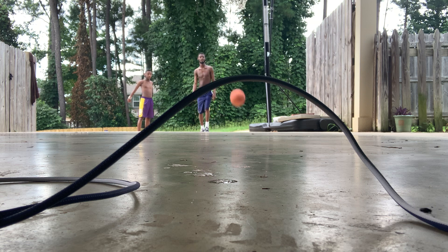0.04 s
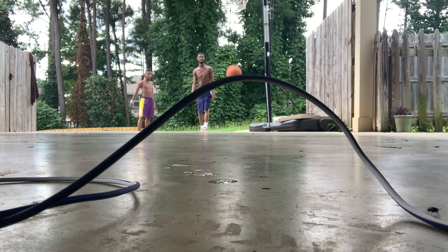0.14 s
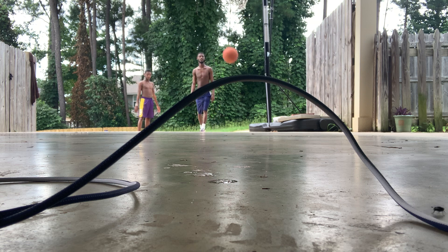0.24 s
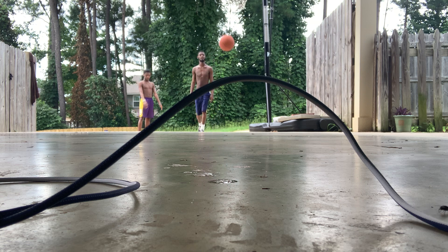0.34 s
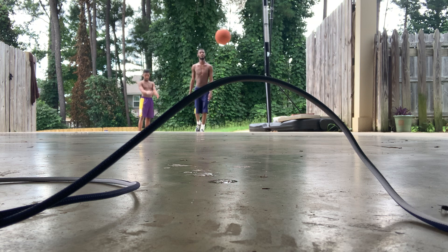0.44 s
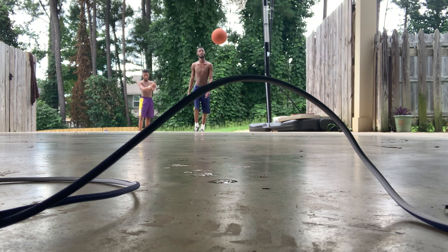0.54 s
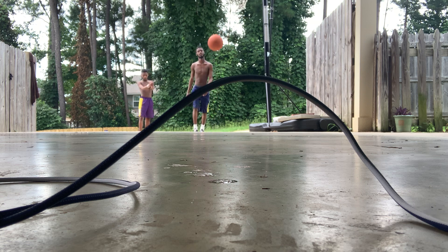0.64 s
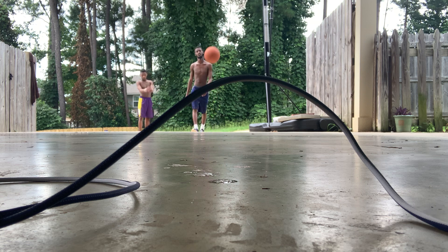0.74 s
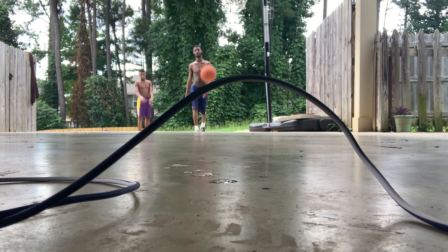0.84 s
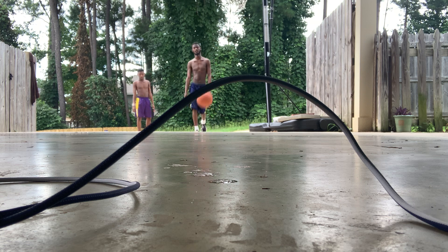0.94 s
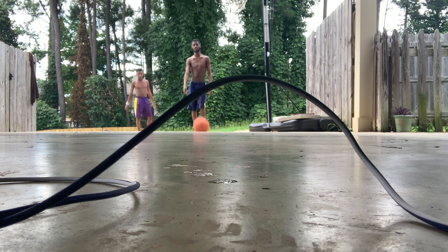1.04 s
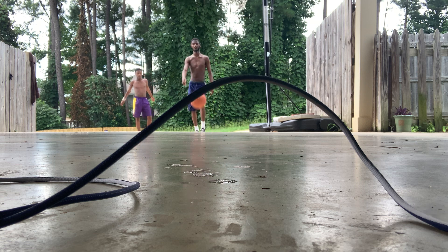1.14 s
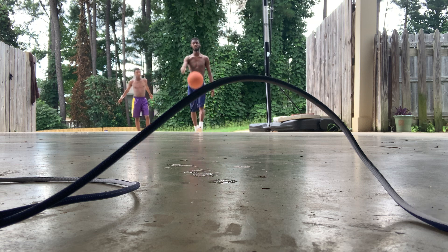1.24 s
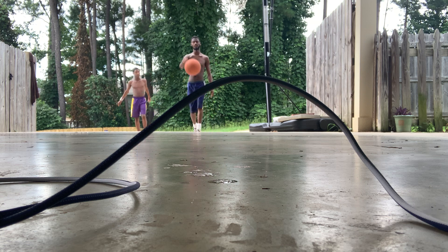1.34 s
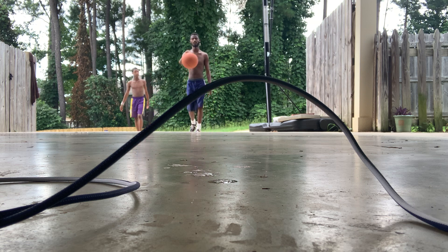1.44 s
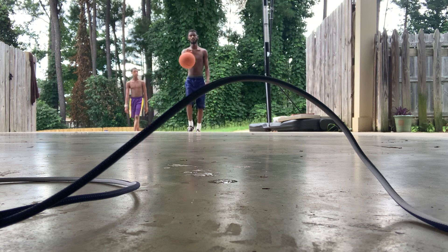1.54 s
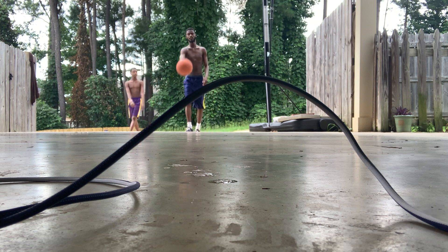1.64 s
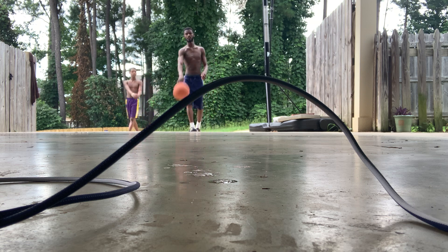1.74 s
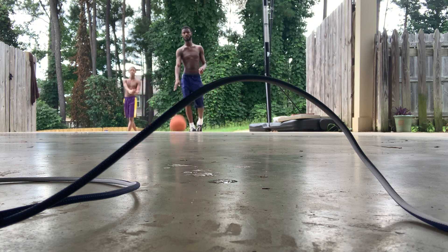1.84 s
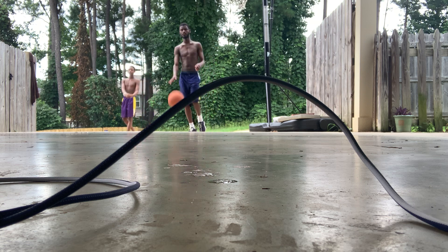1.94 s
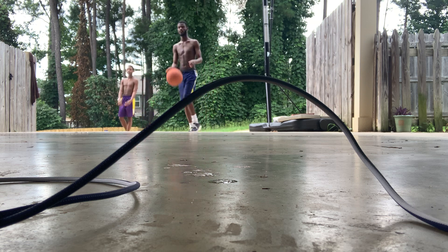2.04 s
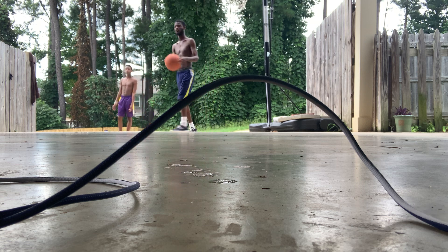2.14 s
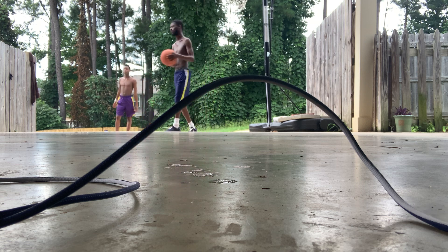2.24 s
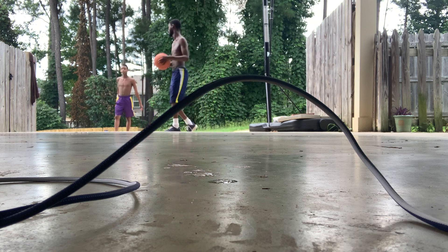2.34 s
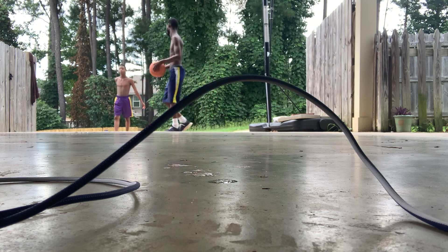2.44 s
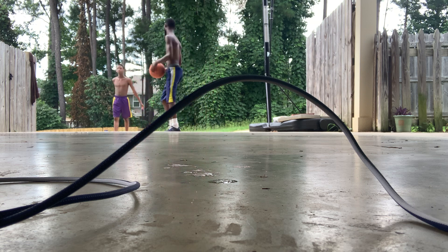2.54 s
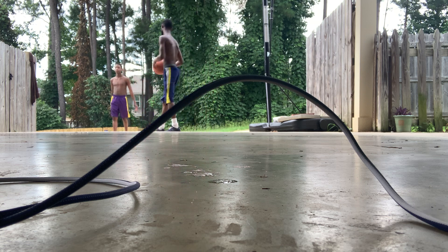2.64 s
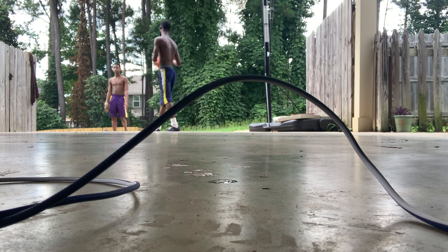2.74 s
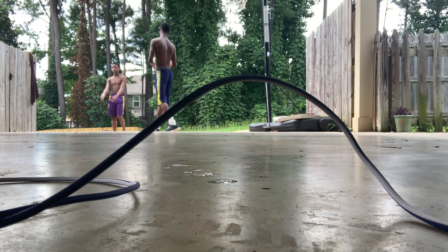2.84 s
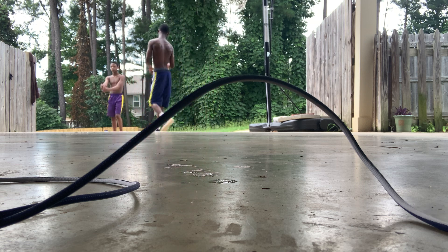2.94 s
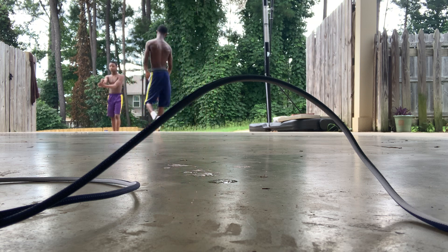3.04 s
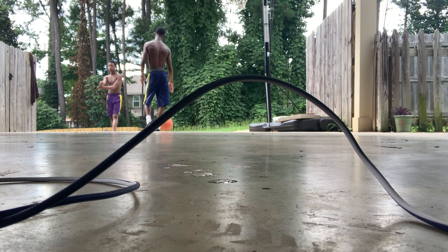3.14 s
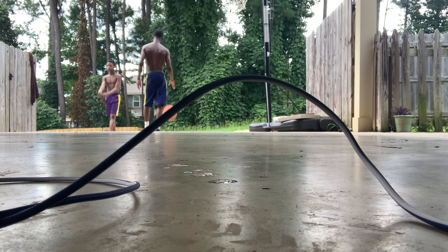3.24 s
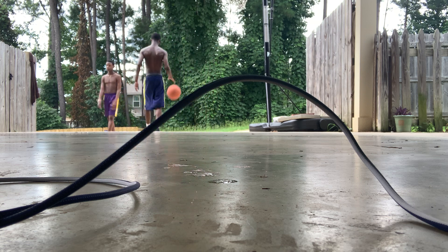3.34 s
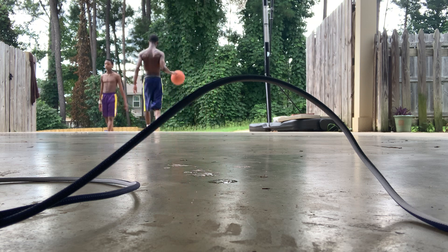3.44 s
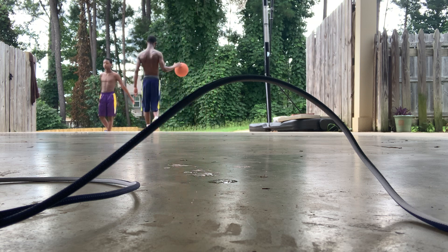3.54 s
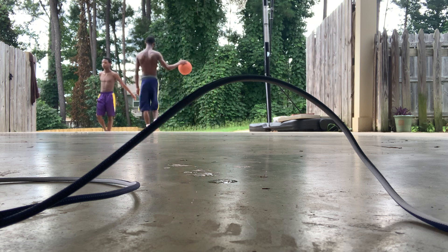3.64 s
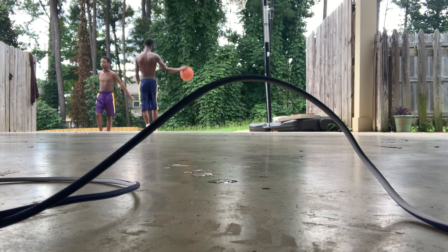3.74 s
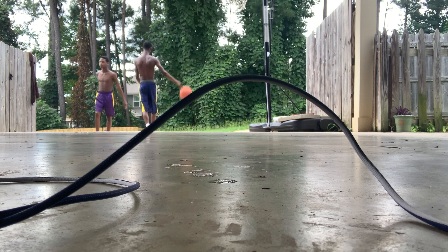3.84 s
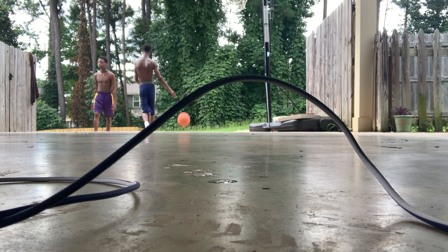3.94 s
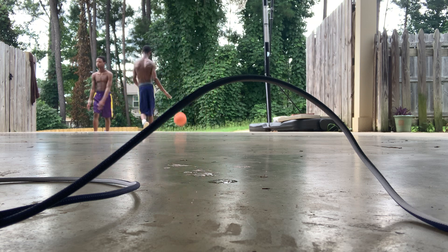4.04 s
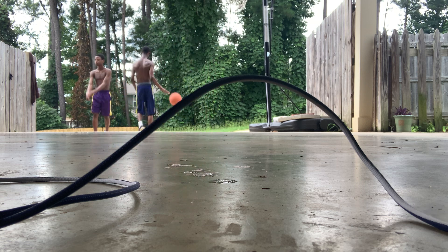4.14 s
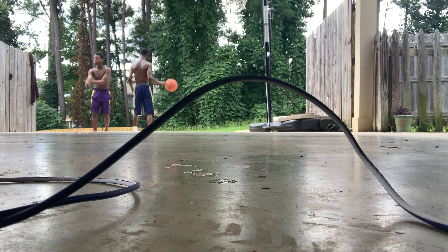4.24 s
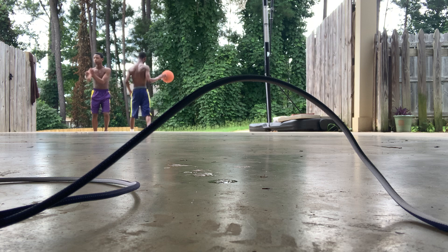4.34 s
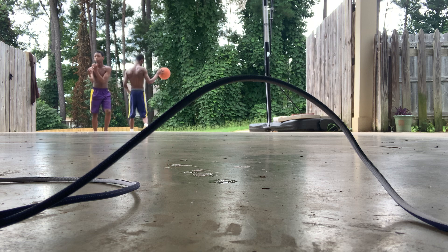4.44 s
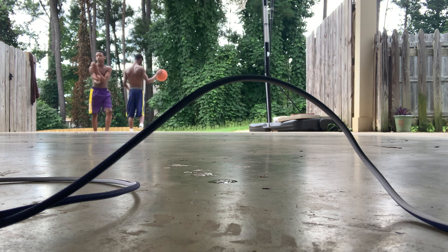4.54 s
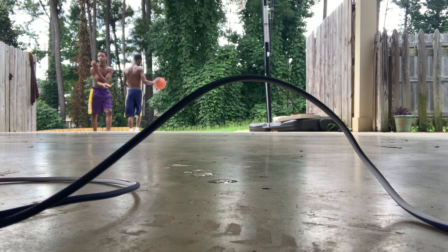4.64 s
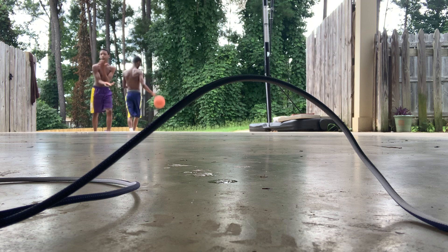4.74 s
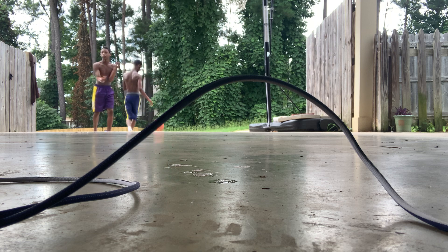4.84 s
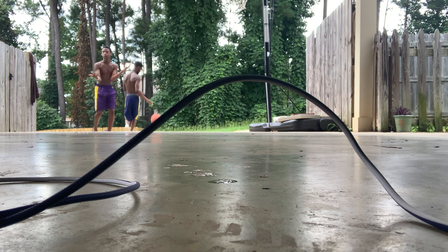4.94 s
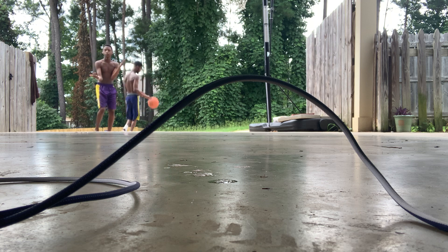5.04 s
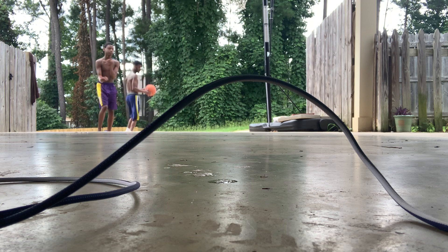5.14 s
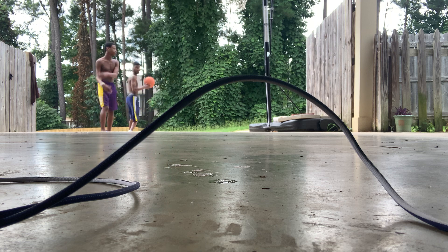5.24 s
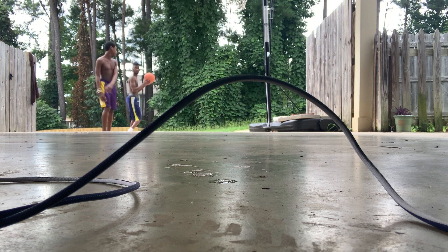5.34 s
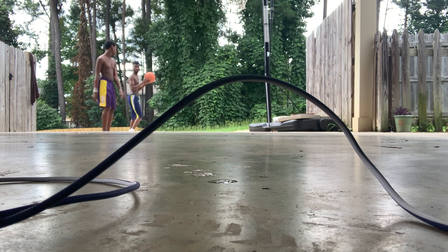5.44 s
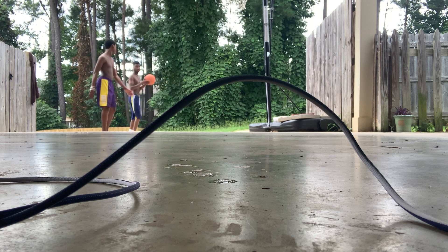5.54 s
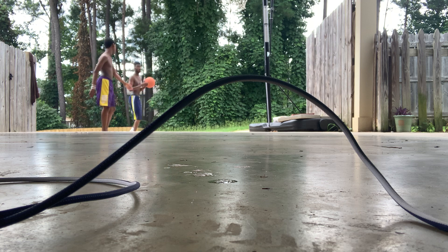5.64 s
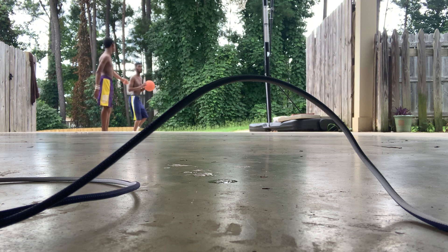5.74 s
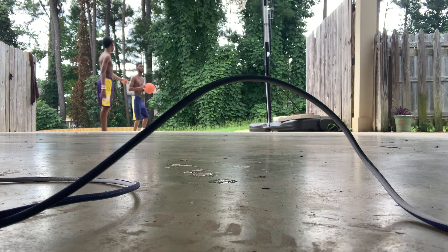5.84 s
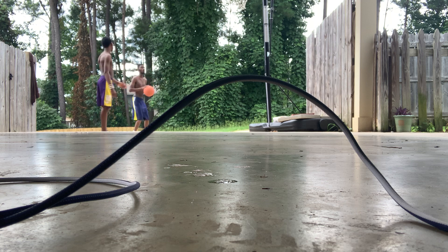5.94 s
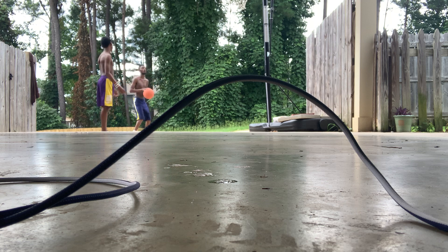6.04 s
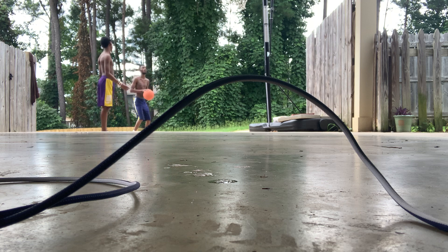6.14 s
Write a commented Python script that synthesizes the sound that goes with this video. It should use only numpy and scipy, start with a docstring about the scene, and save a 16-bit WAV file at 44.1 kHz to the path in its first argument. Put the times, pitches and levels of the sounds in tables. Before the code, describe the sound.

A basketball bounces slowly on a concrete drive, each sharp slap ringing and booming under a carport roof, with soft hand pats, shoe scuffs and faint birds.

```python
"""A basketball is dribbled slowly on a concrete drive, heard from the floor of an open carport. Each bounce is
a noise slap, a click with reflections, ringing ball modes and a low pulse that echoes. Hands pat the ball as
coloured noise with the same ring; steps and gritty scuffs are short noise bursts. Behind are low air noise, a
hum of sines, a band of insect noise, a small bird's long dry trill of falling sweeps, a few far bird calls and
a thin level note that comes and goes, both made of fluttering sines, all blurred by the trees."""
import sys
import numpy as np
from scipy import signal
from scipy.fft import rfft, irfft
from scipy.io import wavfile

SR = 44100
rng = np.random.default_rng(int(sys.argv[2]) if len(sys.argv) > 2 else 0)


def dump_mix(stems):
    """Bounce the given channels to the path in sys.argv[1] as a 16-bit WAV at rate SR."""
    frames = np.atleast_2d(stems).T  # one column per channel
    limited = np.clip(frames, -1, 1)  # hard clip at full scale
    pcm = np.round(limited * 32767).astype(np.int16)
    wavfile.write(sys.argv[1], SR, pcm)


N = 272960
TIME = np.arange(N) / SR
AGE = np.arange(SR) / SR   # the second that follows a blow


def from_db(db):
    """Turn decibels into an amplitude gain."""
    return 10 ** (np.asarray(db) / 20)


def rms_one(x):
    """Scale a sound to an rms of 1."""
    return x / np.sqrt(np.mean(x ** 2) + 1e-20)


def at_hz(points, hz, axis=1):
    """Read one column of a table on a log-frequency axis."""
    table = np.array(points)
    return np.interp(np.log(hz + 1e-3), np.log(table[:, 0]), table[:, axis])


def bins(x):
    """Frequencies of the sound's spectrum, in Hz."""
    return np.fft.rfftfreq(x.shape[-1], 1 / SR)


def bump(hz, centre_hz, octaves):
    """A bell of height 1 on a log-frequency axis."""
    return np.exp(-.5 * (np.log2((hz + 1e-3) / centre_hz) / octaves) ** 2)


def decay(t60):
    """Exponential tail that drops 60 dB in t60 seconds."""
    return from_db(-60 * AGE / t60)


def delay(hz, seconds):
    """Spectrum of a pure delay."""
    return np.exp(-2j * np.pi * hz * seconds)


def drift(rate, size):
    """Random values of spread 1, `rate` of them a second, joined by straight lines."""
    knots = rng.standard_normal(int(size / SR * rate) + 2)
    return np.interp(np.arange(size) / SR * rate, np.arange(len(knots)), knots)


def gate(at, start, end, attack, release):
    """Rise, hold at 1 and fall, in straight lines."""
    return np.clip(np.minimum((at - start) / attack, (end - at) / release), 0, 1)


def add(out, start_s, sound):
    """Mix a sound in at its time."""
    at = round(start_s * SR)
    first, last = max(at, 0), min(at + sound.shape[-1], N)
    out[:, first:last] += sound[..., first - at:last - at]


# left against right balance; lows sit left, some higher bands right:
# (frequency [Hz], left minus right [dB])
BALANCE = [(60, 2.5), (250, 2), (500, 2.5), (1000, -1.5), (2000, 0.5), (4000, 1.5), (8000, -2)]


def balance_gains(hz):
    """Left and right gains by frequency."""
    return from_db(at_hz(BALANCE, hz) * np.array([[.5], [-.5]]))


# side against mid level by frequency; side far outweighs mid near 9 kHz:
# (frequency [Hz], side minus mid [dB])
SIDE_AGAINST_MID = [(60, -11), (125, -6), (250, -7.5), (500, -0.5), (1000, 4), (2000, 0), (4000, -1),
                    (7000, 1.5), (9000, 25.5), (12000, -7.5)]


def field(hz, level_db):
    """Stereo noise of a given spectrum, mixed from independent mid and side; rms 1."""
    mid, side = rfft(rng.standard_normal((2, 2 * (len(hz) - 1))))
    side = side * from_db(at_hz(SIDE_AGAINST_MID, hz))
    pair = mid + side * np.array([[1], [-1]])
    return rms_one(irfft(pair * from_db(level_db) * balance_gains(hz)))


# colour of the still air between the bounces: (frequency [Hz], relative density [dB per Hz])
AIR_COLOUR = [(20, -23), (40, -5), (80, 0), (120, -1), (165, -13.5), (250, -10), (400, -13), (700, -23),
              (1500, -26), (3000, -30.5), (5000, -42), (8000, -41.5), (9500, -75), (12000, -47.5),
              (15500, -78)]
AIR_DB = -51.5


def still_air():
    """A steady bed of low noise."""
    hz = bins(TIME)
    return from_db(AIR_DB) * field(hz, at_hz(AIR_COLOUR, hz))


# steady hum in the neighbourhood: (frequency [Hz], rms level before wavering [dB])
HUM_TONES = [(75, -60), (240, -65), (297, -70.5)]


def hum(waver_db=2):
    """Low tones whose level and phase waver at random."""
    out = 0
    for tone_hz, db in HUM_TONES:
        level = from_db(db + waver_db * drift(9, N))
        phase = 2 * np.pi * tone_hz * TIME + drift(4.3, N)
        out = out + np.sqrt(2) * level * np.sin(phase)
    return out


# colour of the insects in the trees: (frequency [Hz], relative density [dB per Hz])
INSECT_COLOUR = [(2800, -43), (3600, -15.5), (4150, -6.5), (4600, -12), (5400, -25.5), (9000, -71)]
INSECT_DB, INSECT_SWELL_DB, INSECT_SWELLS_PER_S = -70.5, 1.2, 3.05


def insects():
    """A thin band of noise that swells slowly and chirps unevenly."""
    hz = bins(TIME)
    swell_db = INSECT_SWELL_DB * drift(INSECT_SWELLS_PER_S, N)
    chirping_db = 3.5 * drift(22, N)
    return from_db(INSECT_DB + swell_db + chirping_db) * field(hz, at_hz(INSECT_COLOUR, hz))


def among_trees(song, direct_db=-11, woods_t60_s=0.33):
    """A far call arrives mostly as a blur of echoes from the trunks."""
    woods = rms_one(rng.standard_normal((2, SR)) * decay(woods_t60_s)) / np.sqrt(SR)
    return from_db(direct_db) * song + signal.fftconvolve(song[None], woods, axes=1)[:, :N]


def whistle(start, length, first_hz, last_hz, db, flutter, flutters_per_s, waver_db=3, edge_s=0.027):
    """A faint note whose pitch glides, with random flutter in phase (radians) and waver in level."""
    end = start + length
    level = from_db(db + waver_db * drift(24.85, N))
    level = level * gate(TIME, start - edge_s / 2, end + edge_s / 2, edge_s, edge_s)
    pitch = np.interp(TIME, [start, end], [first_hz, last_hz])
    phase = 2 * np.pi * np.cumsum(pitch) / SR + flutter * drift(flutters_per_s, N)
    return np.sqrt(2) * level * np.sin(phase)


# a thin level note comes and goes: (start [s], level before the trees [dB])
LEVEL_NOTES = [(.11, -68), (1.37, -66), (2.19, -68), (3.36, -67.5)]
NOTE_HZ, NOTE_S, NOTE_FLUTTER = 2790, 0.22, 0.74   # flutter in radians
# a far bird gives hoarse slurred calls: # (start [s], length [s], first pitch [Hz], last pitch [Hz], level
# before the trees [dB])
SLURRED_CALLS = [(.215, 0.088, 2420, 2268, -56.5), (.64, 0.093, 3490, 4250, -58.5),
                 (2.88, 0.2, 2990, 2110, -60.5)]
SLUR_FLUTTER = 3.3   # radians


def far_notes():
    """A thin level note comes and goes; stronger, faster flutter makes a far bird's slurs hoarse."""
    song = np.zeros(N)
    for s, db in LEVEL_NOTES:
        song += whistle(s, NOTE_S, NOTE_HZ, NOTE_HZ, db, NOTE_FLUTTER, flutters_per_s=110)
    for slur in SLURRED_CALLS:
        song += whistle(*slur, SLUR_FLUTTER, flutters_per_s=230)
    return among_trees(song)


CHIPS_PER_S = 18.1
# the trill swells, holds and stops; its level is set before the trees
TRILL_START_S, TRILL_ATTACK_S, TRILL_END_S, TRILL_RELEASE_S, TRILL_DB = 0.48, 0.57, 4.53, 0.48, -59
# each chip is one falling sweep: a faint lead-in, then the loud part
CHIP_TOP_HZ, CHIP_FALL_HZ = 7926, 3860
# places and lengths as shares of the chip cycle
LEAD_AT, LEAD_LENGTH, LEAD_DB = 0.088, 0.038, -6
LOUD_FROM, LOUD_TO, CHIP_EDGE = 0.29, 0.86, 0.064


def trilling_bird(wobble_hz=280):
    """A fast series of falling chips; rapid random wobble of the pitch makes them buzzy."""
    cycle = np.cumsum(CHIPS_PER_S * (1 + 0.0065 * drift(4.0, N))) / SR % 1
    pitch = CHIP_TOP_HZ - CHIP_FALL_HZ * cycle + wobble_hz * drift(1500, N)
    lead_in = from_db(LEAD_DB) * np.exp(-.5 * ((cycle - LEAD_AT) / LEAD_LENGTH) ** 2)
    chip = lead_in + gate(cycle, LOUD_FROM, LOUD_TO, CHIP_EDGE, CHIP_EDGE)
    trill = rms_one(chip * np.sin(2 * np.pi * np.cumsum(pitch) / SR))
    effort = gate(TIME, TRILL_START_S, TRILL_END_S, TRILL_ATTACK_S, TRILL_RELEASE_S)
    return among_trees(trill * from_db(TRILL_DB) * effort)


# shoes scuff on gritty concrete: (middle [s], half length [s], level before the stroke shape [dB])
SHOE_SCUFFS = [(1.731, 0.032, -45), (2.674, 0.022, -54), (2.96, 0.027, -52.5), (3.059, 0.033, -51.5),
               (3.851, 0.026, -50.5), (3.971, 0.061, -49), (4.367, 0.026, -48.5), (5.291, 0.039, -50),
               (5.561, 0.027, -57.5), (5.715, 0.048, -55)]
# colour of the grit under a sole: (frequency [Hz], relative density [dB per Hz])
GRIT_COLOUR = [(300, -13), (1200, 2), (2300, 3), (4300, 3), (7000, -2), (9300, -26), (12000, -5),
               (15500, -14)]
SCUFF_GRAINS_PER_S, SCUFF_GRAIN_DB = 170, 2.5


def scuffs():
    """Gritty noise swells and fades, its level jittering as the sole catches and slips."""
    out, hz = np.zeros((2, N)), bins(AGE)
    for s, half_s, db in SHOE_SCUFFS:
        stroke = np.exp(-.5 * ((AGE - .5) / half_s) ** 2)
        grains = from_db(SCUFF_GRAIN_DB * drift(SCUFF_GRAINS_PER_S, SR))
        add(out, s - .5, from_db(db) * field(hz, at_hz(GRIT_COLOUR, hz)) * stroke * grains)
    return out


def touch(touch_s=0.0014):
    """Soft onset of a contact."""
    return 1 - np.exp(-AGE / touch_s)


def dulling(hz):
    """Spectrum in dB that bends down towards 6 dB per octave above 7 kHz."""
    return -6 * np.log2(1 + hz / 7000)


SKIRT_DB = 32   # height of a resonance above its surroundings
# shoes tap the concrete: (time [s], level before the decay [dB])
SHOE_STEPS = [(2.769, -49.5), (3.032, -44), (4.648, -50)]


def steps(centre_hz=1900, octaves=1.28, t60_s=0.071):
    """Each tap is a short burst of noise round one broad resonance."""
    out, hz = np.zeros((2, N)), bins(AGE)
    colour = SKIRT_DB * bump(hz, centre_hz, octaves) + dulling(hz)
    for s, db in SHOE_STEPS:
        add(out, s, from_db(db) * field(hz, colour) * decay(t60_s) * touch())
    return out


# modes of the ball's shell and air: (mean frequency [Hz], mean level [dB], t60 [s])
BALL_MODES = [(570, -22, .3), (840, -19, .27), (921, -20, .3), (1110, -19, .28), (1595, -16, .22),
              (1949, -21, .25), (2287, -21, .24), (2646, -20, .24), (3305, -20, .24), (4150, -26, .24),
              (4880, -27, .24)]


def ball_ring(spread_db=1.5):
    """Each blow rings the same modes, with slightly random strengths and pitches."""
    out = 0
    for hz, db, t60 in BALL_MODES:
        phases = rng.uniform(0, 2 * np.pi, (2, 1))
        pitch = hz * (1 + .004 * rng.standard_normal())
        strength = from_db(db + spread_db * rng.standard_normal())
        out = out + strength * decay(t60) * np.sin(2 * np.pi * pitch * AGE + phases)
    return out


# hands catch the ball: (time [s], level before the decay [dB], brightness [dB per octave])
HAND_PATS = [(0.216, -51, 9), (1.646, -42, -12), (2.2096, -42, 2)]
# what a pat rings with: (frequency [Hz], relative level [dB], half the bell's spread [octaves])
PAT_MODES = [(353, 0, 0.34), (1040, -8, .28), (3040, -13, 0.61)]
PAT_T60_S, PAT_RING_DB, PAT_SMACK_DB, PAT_SMACK_T60_S = 0.32, 2.5, 0, 0.028


def hands():
    """A palm's coloured noise, with a short smack and a longer tail, sets the ball ringing."""
    out, hz = np.zeros((2, N)), bins(AGE)
    bells = [db + SKIRT_DB * bump(hz, centre_hz, 2 * octaves) for centre_hz, db, octaves in PAT_MODES]
    tilt = np.minimum(np.log2(1 + hz / 1000), 2)   # levels off at 3 kHz
    envelope = decay(PAT_T60_S) + from_db(PAT_SMACK_DB) * decay(PAT_SMACK_T60_S)
    for s, db, tilt_db in HAND_PATS:
        palm = field(hz, np.max(bells, axis=0) + tilt_db * tilt + 2 * dulling(hz)) * envelope
        add(out, s, from_db(db) * (palm + from_db(PAT_RING_DB) * ball_ring()) * touch())
    return out


# low echoes from the house and fence: (delay [s], level [dB])
LOW_ECHOES = [(.058, -1.9), (.0633, -2.6), (.0833, -10.4)]
# standing waves under the roof: (frequency [Hz], level [dB], t60 [s])
ROOF_MODES = [(54.9, 15.5, 0.52), (74.9, -3.5, 0.71), (90.64, 4, 0.65)]


def thump(wall_s, wall_db, low_hz=73, high_hz=107, squash_s=.0081):
    """The squashed ball pushes out a low pulse; walls throw it back and standing waves take it up."""
    hz = bins(AGE)
    band = signal.butter(3, [low_hz, high_hz], "band", fs=SR, output="sos")
    pulse = signal.sosfilt(band, signal.unit_impulse(SR))
    paths = 1 + from_db(wall_db) * delay(hz, wall_s)
    for echo_s, db in LOW_ECHOES:
        paths = paths + from_db(db) * delay(hz, echo_s)
    s = 2j * np.pi * hz   # each mode is a damped resonator
    for mode_hz, db, t60 in ROOF_MODES:
        damping = 2 * np.log(1000) / t60
        paths = paths + from_db(db) * damping * s / (s * s + damping * s + (2 * np.pi * mode_hz) ** 2)
    spectrum = rfft(pulse / np.abs(pulse).max()) * delay(hz, squash_s)
    return irfft(spectrum * paths * balance_gains(hz))


def crack(side_s, roof_s, direct_db=11, side_db=9, roof_db=12, low_hz=700, high_hz=3600, top_hz=7200,
          port_lag_s=0.00015, scatter_db=6, scatter_t60=0.18, skin_hz=1150, skin_db=-9, skin_t60=0.0022,
          count=26):
    """The first sharp wavefront, its reflections from side wall and roof, then from posts and fence."""
    band = signal.butter(2, [low_hz, high_hz], "band", fs=SR, output="sos")
    click = signal.sosfilt(band, signal.unit_impulse(SR))
    click = signal.sosfilt(signal.butter(5, top_hz, fs=SR, output="sos"), click)
    # the flattened patch of skin flutters for a few cycles
    flutter = from_db(skin_db) * decay(skin_t60) * np.sin(2 * np.pi * skin_hz * AGE)
    click = click / np.abs(click).max() + flutter
    hz = bins(AGE)
    ports = delay(hz, np.array([[0], [port_lag_s]]))   # sound from the left reaches the left side first
    reflections = from_db(side_db) * delay(hz, side_s) + from_db(roof_db) * delay(hz, roof_s)
    scattered = np.zeros((2, SR))
    # random arrival times and left-right lags, in seconds
    for s, across in rng.uniform([.002, -.0004], [.12, .0004], (count, 2)):
        scattered[[0, 1], [int(s * SR), int((s + across) * SR)]] += rng.choice([-1, 1])
    scattered = from_db(scatter_db) * rfft(scattered * decay(scatter_t60))
    return -irfft(rfft(click) * (from_db(direct_db) + ports * reflections + scattered))


# the carport's diffuse sound:
# (frequency [Hz], build-up [s], early t60 [s], late t60 [s], late level [dB])
CARPORT_TAILS = [(80, 0.011, 0.61, 1, -3), (196, 0.0046, 0.32, 0.64, -21), (443, 0.0026, 0.26, 0.91, -16),
                 (1000, 0.0056, 0.28, 0.86, -20), (2320, 0.0072, 0.14, 0.52, -8),
                 (4330, 0.0041, 0.34, 0.67, -11), (11900, 0.00076, 0.064, 0.17, -6.5)]


def reverberate(near, far):
    """In each octave both sounds build up; the near one dies under the roof, the far one in the yard."""
    hz, spectra, out = bins(near), rfft(np.array([near, far])), 0
    centres = 62.5 * 2 ** np.arange(9)
    for centre, pick in zip(centres, np.eye(len(centres))):
        octave = np.interp(np.log(hz + 1e-3), np.log(centres), pick)
        roofed, yard = irfft(spectra * octave)
        rise, early, late, late_db = [at_hz(CARPORT_TAILS, centre, axis=k) for k in range(1, 5)]
        tails = roofed * decay(early) + yard * from_db(late_db) * decay(late)
        out = out + (1 - np.exp(-AGE / rise)) * tails
    return out


# colour of the rubber skin's slap: (frequency [Hz], relative density [dB per Hz])
SLAP_COLOUR = [(20, -50), (30, -28), (45, 2), (90, 7.5), (150, 8), (220, 7.5), (350, 5), (580, -6),
               (800, 0.5), (1350, -2), (2200, -3.5), (3600, -7), (5500, -12.5), (7400, -19.5),
               (9000, -39.5), (12500, -20.5), (15500, -42)]
KNOCK_DB = 9.7   # height of the hollow knock


def slap(body_db, bright_db, top_db, knock_hz, knock_db, knock_octaves, overtone_db,
         level_db=5.0, overtone_ratio=1.58, yard_db=-1.0):
    """The skin smacks concrete; how flat and hard it lands sets colour and a knock with one overtone."""
    hz = bins(AGE)
    colour = at_hz(SLAP_COLOUR, hz) + body_db * bump(hz, 286, 0.67)
    colour = colour + bright_db * bump(hz, 4330, 0.61) + top_db * bump(hz, 11500, 0.38)
    knock = knock_db * bump(hz, knock_hz, knock_octaves)
    knock = knock + overtone_db * bump(hz, overtone_ratio * knock_hz, knock_octaves)
    # random ripple makes the noise uneven in pitch
    ripple = 4.5 * np.interp(hz / 55, np.arange(500), rng.standard_normal(500)) * hz / (hz + 400)
    near = field(hz, colour + knock + ripple)
    far = from_db(yard_db) * field(hz, colour + 0.51 * knock + .5 * ripple)
    return from_db(level_db) * reverberate(near, far)


# bounces: (time [s], gain of slap, ring and crack [dB], distance [m], body [dB], brightness [dB],
# top treble [dB], knock pitch [Hz], knock width [octaves], overtone [dB])
BALL_BOUNCES = [(-0.022, -22, 8.4, 3.5, -1, 10, 710, .35, -1.5),
                (1.0570, -20, 7.8, -1.5, 0, -8, 1120, 0.13, 1.5),
                (1.8711, -17.2, 7.5, 0, -8.5, -9.5, 660, .21, 3),
                (3.1927, -20.5, 9, 0, -6.5, 2, 857, 0.058, 1),
                (4.0155, -18.4, 10, -2.5, 0, -3.5, 830, .14, 5.5),
                (4.908, -20.5, 11.4, 4, -1, -3.5, 850, .29, 7.5)]
SIDE_WALL_S, ROOF_S, BACK_WALL_S = .0051, .0108, 0.0182   # delays of the first reflections
MID_DRIVE_M, THUMP_DB = 8.8, -16   # thump gain at mid-drive; it falls as 1 / distance
BACK_WALL_DB, BACK_WALL_DB_PER_M = 2.5, -1.5   # echo at mid-drive; it fades as the player walks away


def dribble():
    """Slap, crack, ring and thump of every bounce."""
    out = np.zeros((2, N))
    for (s, slap_db, metres, body_db, bright_db, top_db,
         knock_hz, knock_octaves, overtone_db) in BALL_BOUNCES:
        smack = slap(body_db, bright_db, top_db, knock_hz, KNOCK_DB, knock_octaves, overtone_db)
        smack = smack + ball_ring() + from_db(.5 * bright_db) * crack(SIDE_WALL_S, ROOF_S)
        low = thump(BACK_WALL_S, BACK_WALL_DB + BACK_WALL_DB_PER_M * (metres - MID_DRIVE_M))
        add(out, s, from_db(slap_db) * smack + from_db(THUMP_DB) * MID_DRIVE_M / metres * low)
    return out


def scene():
    """Mix from the background up to the ball."""
    background = still_air() + hum() + insects() + far_notes() + trilling_bird()
    return background + scuffs() + steps() + hands() + dribble()


def record(dry, cutoff_hz=15600):
    """The top is cut steeply."""
    return signal.sosfilt(signal.ellip(10, .1, 80, cutoff_hz, fs=SR, output="sos"), dry)


dry = scene()
out = record(dry)
dump_mix(out)
```